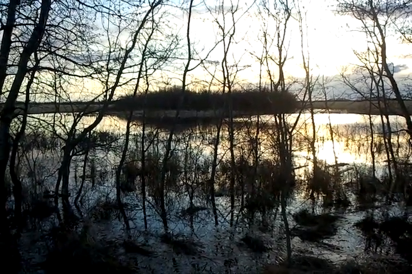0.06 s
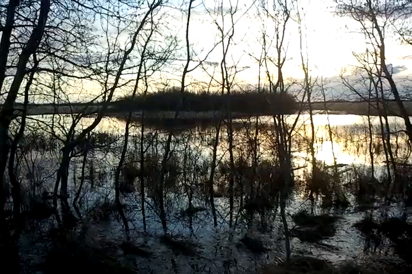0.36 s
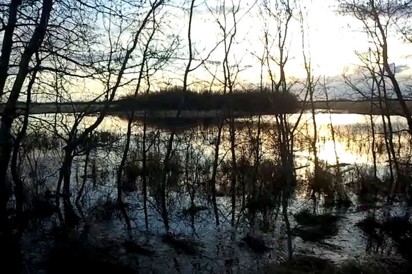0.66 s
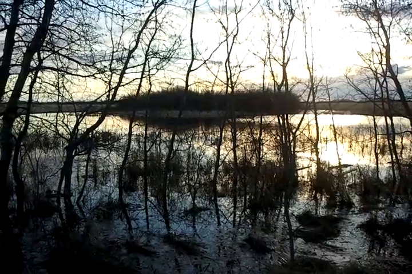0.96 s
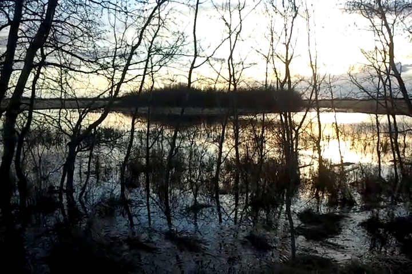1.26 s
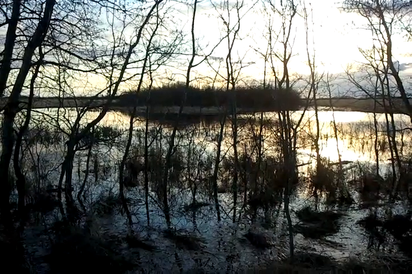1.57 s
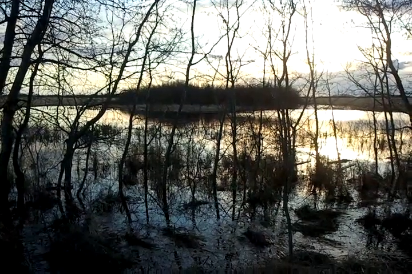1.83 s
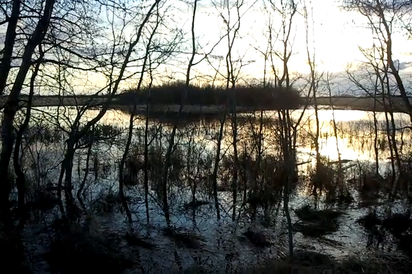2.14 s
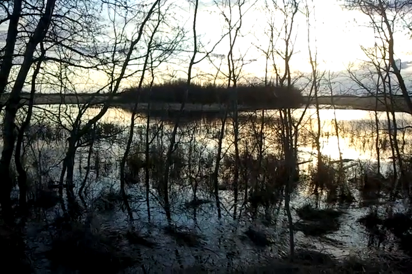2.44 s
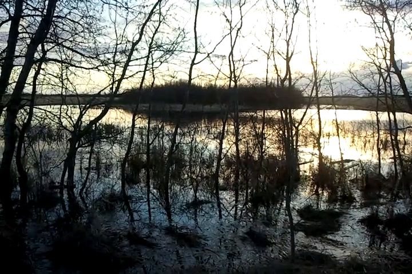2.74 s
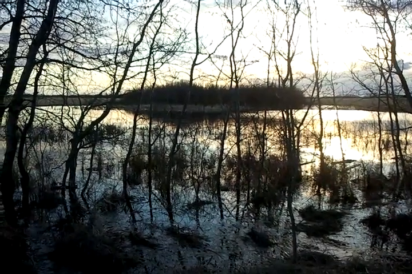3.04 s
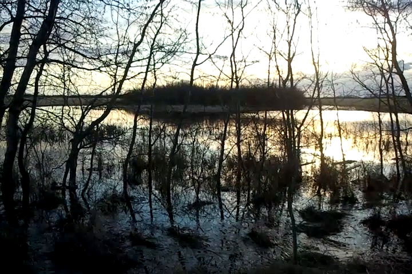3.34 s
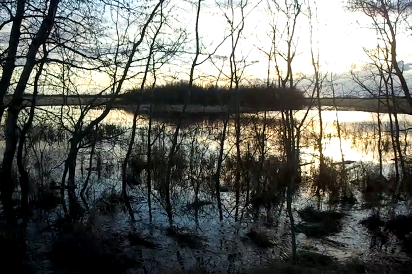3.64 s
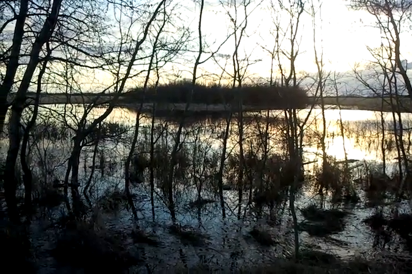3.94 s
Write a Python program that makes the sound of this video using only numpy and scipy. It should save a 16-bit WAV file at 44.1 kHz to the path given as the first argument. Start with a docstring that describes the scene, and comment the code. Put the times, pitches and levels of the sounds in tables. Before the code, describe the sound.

Frogs call in quick runs of sharp clicks that climb and grow louder, first in turn, then several together. Wind rumbles softly on the microphone over faint marsh birds and traffic, and a far engine hum enters near the end.

```python
"""At the wooded edge of a marsh, chorus frogs trill: overlapping calls, each a run of clicks that
climbs in pitch and strength. Every click is a few milliseconds of a buzzing voice box ringing the
vocal sac, the frog's throat balloon; tree trunks and the wood throw the sound back.
Behind them far water birds call, traffic murmurs, wind rumbles on the microphone
and a distant engine hums up near the end."""
import sys
import numpy as np
from scipy import signal
from scipy.fft import rfft, irfft
from scipy.io import wavfile
from scipy.ndimage import uniform_filter1d

SR = 44100
rng = np.random.default_rng(int(sys.argv[2]) if len(sys.argv) > 2 else 0)


def master_out(mix):
    """Clip the mix to full scale and print it as 16-bit PCM to the path in sys.argv[1]."""
    frames = np.transpose(np.atleast_2d(mix))
    ceiling = np.clip(frames, -1, 1)
    pcm = np.round(ceiling * 32767).astype(np.int16)
    wavfile.write(sys.argv[1], SR, pcm)


N = 176400  # 4 seconds


def gain(db):
    """Turn decibels into a number to multiply by."""
    return 10 ** (np.asarray(db) / 20)


def normalize(x):
    """Scale a sound to an average strength (rms) of 1."""
    return x / np.sqrt(np.mean(x ** 2) + 1e-18)


def colour(x, curve):
    """Filter by a curve of (frequency [Hz], gain [dB]), fading 30 dB per octave beyond its ends."""
    hz, db = np.array(curve, float).T
    octaves = np.log2(np.maximum(np.arange(len(x) // 2 + 1) * SR / len(x), 1))
    beyond = np.maximum(np.log2(hz[0]) - octaves, 0) + np.maximum(octaves - np.log2(hz[-1]), 0)
    return irfft(rfft(x) * gain(np.interp(octaves, np.log2(hz), db) - 30 * beyond), len(x))


def noise(curve, count=N):
    """Noise of strength 1, with its lows and highs shaped by the curve."""
    return normalize(colour(rng.standard_normal(count), curve))


def wander(per_s):
    """A smooth random drift, about 1 in size, that takes per_s steps a second."""
    hold = max(int(SR / per_s), 1)
    steps = np.repeat(rng.standard_normal(N // hold + 1), hold)
    return normalize(uniform_filter1d(uniform_filter1d(steps, hold), hold)[:N])


def add(out, start_s, x):
    """Mix x into out from a given time."""
    i = max(int(start_s * SR), 0)
    out[i:i + len(x)] += x[:max(N - i, 0)]


# Tone of far traffic (frequency [Hz], relative level [dB])
TRAFFIC_TONE = [(200, -1), (260, -3), (360, -5), (520, -6.5), (640, -6.5), (780, -3.5), (930, -6.5),
                (1100, -10), (1400, -13), (1750, -21)]
# Tone of the faint hiss (frequency [Hz], relative level [dB])
HISS_TONE = [(1100, -5), (1500, 1.5), (2000, -1.5), (3000, 1), (4500, -3), (7000, -1), (8500, -13)]
def traffic_and_hiss(t):
    """Far traffic wavers and grows slightly louder under a steady hiss."""
    traffic = noise(TRAFFIC_TONE) * gain(-50.5 + 0.58 * t + 0.73 * wander(2.5))
    return traffic + gain(-57) * noise(HISS_TONE)


# The engine's two notes (start [s], pitch [Hz], level [dB])
ENGINE_NOTES = [(3.6, 99, -33.5), (3.23, 252, -56)]
def engine(t):
    """A distant engine hums: each note fades in quickly and wobbles a little in pitch."""
    rise_s, wobble = 0.065, 0.0071
    out = np.zeros(N)
    for start, hz, db in ENGINE_NOTES:
        phase = 2 * np.pi * np.cumsum(hz * (1 + wobble * wander(11))) / SR
        fade_in = np.clip((t - start) / rise_s, 0, 1)
        out += gain(db) * fade_in * np.sqrt(2) * np.sin(phase)
    return out


# Tone of the deep gusts (frequency [Hz], relative level [dB])
GUST_TONE = [(12, -1), (25, -1), (38, -1), (58, -0.5), (80, -10), (110, -23.5), (170, -39)]
# How the gusts rise and fall (time [s], relative level [dB])
GUST_LEVELS = [(0.0, -38), (0.27, -33.5), (0.78, -34.5), (0.83, -23), (0.9, -39), (0.93, -29), (1.18, -37),
               (1.27, -26), (1.3, -33), (1.63, -25), (1.66, -32), (1.74, -22.5), (1.94, -33), (1.99, -26),
               (2.21, -38), (2.32, -22), (2.47, -32.5), (2.91, -29.5), (3.0, -39), (3.04, -24), (3.13, -40),
               (3.2, -29.5), (3.6, -39), (3.63, -32.5), (3.74, -40), (4.0, -28)]
# Tone of the rumble, a little higher than the gusts (frequency [Hz], relative level [dB])
RUMBLE_TONE = [(65, -4), (95, 1), (120, -5.5), (165, -14), (300, -23.5), (600, -43.5)]
# How the rumble swells (time [s], level [dB])
RUMBLE_LEVELS = [(0, -43.5), (.6, -43), (1.2, -43), (1.8, -41), (2.3, -39), (2.8, -36.5), (3.1, -37.5),
                 (3.5, -40.5), (4, -41)]
# Tone of the soft puffs (frequency [Hz], relative level [dB])
PUFF_TONE = [(70, 0.5), (130, 8), (300, -13.5), (500, -28.5), (1000, -53)]
# Each puff (time of peak [s], half width [s], level [dB])
PUFFS = [(2.642, 0.017, -39), (2.723, 0.014, -33), (2.9, 0.033, -40)]
def wind(t):
    """Wind on the microphone: deep gusts, a steadier rumble and a few soft puffs."""
    gusts = noise(GUST_TONE) * gain(np.interp(t, *np.array(GUST_LEVELS).T) + 1)
    rumble = noise(RUMBLE_TONE) * gain(np.interp(t, *np.array(RUMBLE_LEVELS).T))
    puff_swells = sum(gain(db) * np.exp(-((t - peak) / width) ** 2 / 2) for peak, width, db in PUFFS)
    return gusts + rumble + noise(PUFF_TONE) * puff_swells


# Tone of the wood's echo (frequency [Hz], relative level [dB])
ECHO_TONE = [(1000, -5.5), (3000, 4), (4500, -5), (8000, -6)]
def wood_echo(x, fade_s=0.59):
    """The wood scatters x into a blur as strong as x itself, which dies by 60 dB in fade_s."""
    t = np.arange(SR) / SR
    delay_s = 0.007
    tail = noise(ECHO_TONE, count=SR) * np.exp(-np.log(1000) * t / fade_s) * (t > delay_s)
    return normalize(signal.fftconvolve(x, tail)[:N]) * np.std(x)


# Single echoes off near trunks and the water (delay [s], gain [dB])
BOUNCES = [(0.0085, -17), (0.014, -21.5), (0.026, -21), (.051, -33.5)]
def with_marsh_echoes(x):
    """The sound itself, its single bounces, a short scatter from brush and the wood's longer echo."""
    out = x.copy()
    for delay, db in BOUNCES:
        add(out, delay, gain(db) * x)
    return out + gain(-11) * wood_echo(x, fade_s=0.16) + gain(-9) * wood_echo(x)


def hoot(length_s, top_hz, bend, note_db, octave_db):
    """One bird call: a note and its octave, arching up and down in pitch and loudness."""
    position = np.linspace(-1, 1, int(length_s * SR))  # 0 is the middle of the call
    waver = 0.0043 * wander(90)[:len(position)]
    phase = 2 * np.pi * np.cumsum(top_hz * (1 - bend * position ** 2 + waver)) / SR
    return (1 - position ** 2) * (gain(note_db) * np.sin(phase) + gain(octave_db) * np.sin(2 * phase))


# Bird calls (start [s], length [s], top pitch [Hz], bend [share of pitch], note [dB], octave [dB])
BIRD_CALLS = [(0.611, 0.17, 780, .06, -52.5, -75), (.94, .15, 918, .08, -53, -55)]
def water_birds():
    """Two far hoots over the murmur of a flock so distant that only its echo is heard."""
    flock_hoots_per_s = 7
    calls, flock = np.zeros(N), np.zeros(N)
    for start, *call in BIRD_CALLS:
        add(calls, start, hoot(*call))
    for start in np.arange(0, N / SR, 1 / flock_hoots_per_s):
        late, high, loud = rng.standard_normal(3)
        db = -61 + 2 * loud
        voice = hoot(length_s=0.16, top_hz=794 + 70 * high, bend=0.07, note_db=db, octave_db=db - 13.5)
        add(flock, start + 0.05 * late, voice)
    return calls + gain(-8.5) * wood_echo(calls) + wood_echo(flock)


# Notes in the voice box's buzz (pitch [times the sac's pitch], relative level [dB])
VOICE_BOX_NOTES = [(0.532, -11.5), (1.528, -2), (2.55, -19.5)]
# Tone of the voice box's rasp (frequency [Hz], relative level [dB])
RASP_TONE = [(1200, -7.5), (2300, 1), (3000, -4.5), (4000, 3), (5500, -1), (7300, -5), (9000, 4)]
def frog_click(hz):
    """The voice box snaps open and buzzes; the sac swells and rings on. Returns (sac tone, buzz)."""
    sac_rise_s, sac_fade_from_s, sac_fade_s = 0.0017, 0.0027, 0.0022
    push_rise_s, push_fade_from_s, push_fade_s = 0.00077, 0.0036, 0.0009
    sag_per_s, taut_hz, snap_s = 9.3, 3055, 0.00032
    t = np.arange(1024) / SR
    phase = 2 * np.pi * np.cumsum(hz * (1 - sag_per_s * (t - 0.002))) / SR  # the pitch slides down
    swell = np.sin(np.pi / 2 * np.minimum(t / sac_rise_s, 1))
    ring = swell * np.exp(-np.maximum(t - sac_fade_from_s, 0) / sac_fade_s)
    push = np.minimum(t / push_rise_s, 1) * np.exp(-np.maximum(t - push_fade_from_s, 0) / push_fade_s)
    # Early in a call the sac is slack and low: more rasp, weaker buzzing notes and a weaker octave.
    slack_khz = (taut_hz - hz) / 1000
    notes = sum(gain(db + 1.7 * rng.standard_normal()) * np.sin(ratio * phase + rng.uniform(0, 2 * np.pi))
                for ratio, db in VOICE_BOX_NOTES)
    buzz = gain(-14.5 * slack_khz) * push * notes
    octave = gain(-5 - 9.5 * slack_khz) * ring * np.sin(2 * phase)
    snap = gain(2.5) * np.exp(-t / snap_s)
    rasp = noise(RASP_TONE, count=len(t)) * (gain(-8 + 12 * slack_khz) * push + snap)
    return ring * np.sin(phase), buzz + octave + rasp


def far_frogs():
    """Scattered dull clicks from farther out in the marsh: only the sac tone is heard."""
    from_s, until_s, clicks_per_s = 1.9, 3.5, 18
    out = np.zeros(N)
    for start in np.arange(from_s, until_s, 1 / clicks_per_s):
        late, loud, high = rng.standard_normal(3)
        sac, _ = frog_click(hz=2513 + 100 * high)
        add(out, start + 0.018 * late, gain(-51 + loud) * sac)
    return out


# How the frog's body shapes the buzz (frequency [Hz], gain [dB])
BODY_TONE = [(1300, 6), (1700, -2), (2000, -16.5), (2500, -7.5), (3700, -2.5), (4050, 0), (4650, 1.5),
             (5200, -5), (5800, 0), (6400, -0.5), (6800, -2), (7300, 5), (8400, -14.5)]
# Each near click (start [s], relative level [dB], sac pitch [Hz], extra gain for the buzz [dB])
FROG_CLICKS = [(0.007, -19, 3100, -17), (0.0163, -20.5, 2966, -14), (0.061, -19, 3126, -20),
               (0.085, -22, 2974, -12.5), (0.1365, -23.5, 2914, -19), (0.1558, -20.5, 3046, -16),
               (0.2092, -23, 2950, -20.5), (0.2214, -20, 3030, -17.5), (0.2737, -24.5, 3013, -17.5),
               (0.2797, -31, 2970, -15), (0.5251, -38, 2690, -10.5), (0.5778, -31.5, 2760, -12.5),
               (0.6384, -28, 2774, -11), (0.697, -24.5, 2910, -12), (0.761, -22.5, 2950, -13),
               (0.824, -21, 2964, -12.5), (0.8892, -19.5, 2997, -14), (0.9555, -18, 3062, -13.5),
               (1.025, -16.5, 3098, -14), (1.0958, -15.5, 3170, -14.5), (1.1683, -15, 3167, -13.5),
               (1.2412, -16, 3250, -14), (1.3143, -16, 3202, -15), (1.3868, -15.5, 3318, -15),
               (1.4581, -16, 3332, -16.5), (1.5271, -20, 3293, -15), (1.6566, -41.5, 2480, -28.5),
               (1.7009, -35, 2420, -16), (1.723, -45.5, 2570, -18.5), (1.7495, -30.5, 2630, -11.5),
               (1.7606, -35.5, 2725, -13.5), (1.8048, -26, 2750, -13), (1.8516, -27, 2710, -11),
               (1.8648, -29, 2860, -14), (1.9014, -24.5, 2747, -10), (1.9206, -27, 2800, -15),
               (1.9529, -21, 2797, -15), (1.9811, -24.5, 2860, -15), (2.0063, -19.5, 2786, -15.5),
               (2.045, -26.5, 2980, -15.5), (2.0634, -18, 2885, -14.5), (2.1078, -21.5, 2910, -16.5),
               (2.119, -16, 2910, -17.5), (2.172, -25, 3080, -14), (2.1784, -16, 2994, -18.5),
               (2.2372, -16, 3047, -15.5), (2.2864, -30, 3250, -24.5), (2.2985, -16.5, 3090, -16.5),
               (2.3092, -27, 2950, -11), (2.3586, -19, 3086, -17.5), (2.3675, -25.5, 3160, -22),
               (2.3801, -19, 3020, -18), (2.4171, -17, 3122, -17), (2.448, -19.5, 3137, -19),
               (2.4764, -20, 3166, -18), (2.5196, -23.5, 3134, -17), (2.5389, -36.5, 3460, -15),
               (2.5718, -34, 3190, -35.5), (2.6227, -29, 3260, -21.5), (2.6547, -37, 3300, -23),
               (2.6877, -30.5, 3340, -16.5), (2.729, -31, 2683, -11), (2.7734, -30.5, 2743, -12),
               (2.8182, -27, 2740, -16), (2.8634, -26, 2750, -12), (2.9135, -22.5, 2826, -16.5),
               (2.9635, -26, 2904, -8.5), (2.972, -24, 2760, -17), (3.0169, -24, 2834, -13.5),
               (3.0347, -29, 2890, -18.5), (3.0706, -21.5, 2880, -16), (3.101, -28, 2940, -29),
               (3.1274, -21.5, 2870, -15.5), (3.169, -22, 2850, -19), (3.1805, -31.5, 2655, -8),
               (3.188, -22, 3040, -19), (3.2362, -32, 2710, -9.5), (3.241, -19, 2950, -28),
               (3.25, -23, 2830, -14), (3.2931, -27, 2800, -15.5), (3.3137, -17.5, 2957, -20),
               (3.353, -34.5, 2680, -4.5), (3.382, -22.5, 3007, -15), (3.385, -22.5, 2970, -26.5),
               (3.4146, -32.5, 2740, -8), (3.4483, -20, 2885, -15.5), (3.4775, -34, 2770, -8.5),
               (3.5101, -19.5, 3030, -18.5), (3.5407, -30, 2925, -9.5), (3.561, -24.5, 2956, -17),
               (3.6062, -28.5, 2820, -14.5), (3.6717, -32.5, 2760, -11.5), (3.7339, -34.5, 2854, -9.5),
               (3.7496, -36, 2960, -21.5), (3.9792, -36, 2620, -8), (3.9859, -39, 2400, -9)]
def near_frogs():
    """The near frogs trill in runs of clicks, their buzz coloured by the ringing of the body."""
    sacs, buzzes = np.zeros(N), np.zeros(N)
    for start, db, hz, buzz_db in FROG_CLICKS:
        sac, buzz = frog_click(hz)
        add(sacs, start, gain(db) * sac)
        add(buzzes, start, gain(db + buzz_db) * buzz)
    return gain(-0.5) * (sacs + gain(1.5) * colour(buzzes, BODY_TONE))


def scene():
    """Echoing frogs over birds, wind, traffic and an engine, in one channel."""
    t = np.arange(N) / SR
    frogs = with_marsh_echoes(near_frogs() + far_frogs())
    return (frogs + water_birds() + wind(t) + traffic_and_hiss(t) + engine(t))[None]


def record(dry):
    """Cut the highest treble away steeply."""
    top_hz = 8400
    return signal.sosfilt(signal.ellip(8, 0.3, 70, top_hz, fs=SR, output="sos"), dry)


dry = scene()
out = record(dry)
master_out(out)
```